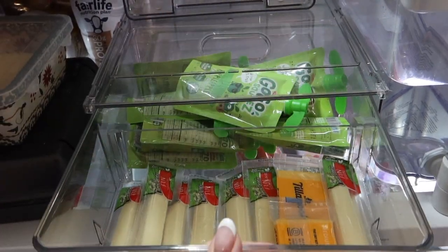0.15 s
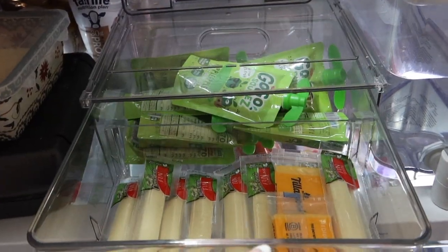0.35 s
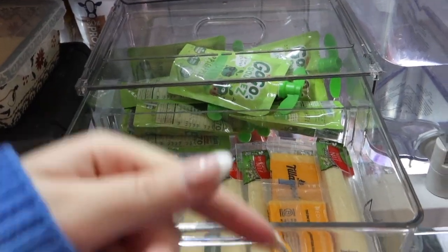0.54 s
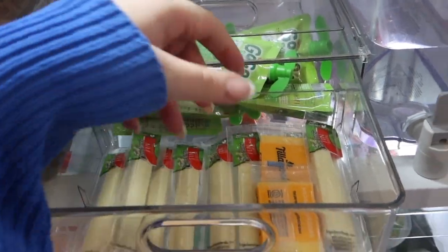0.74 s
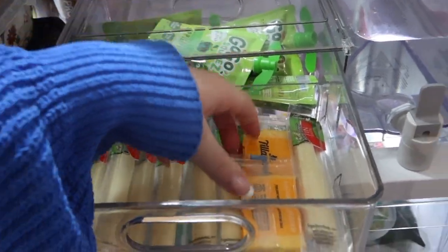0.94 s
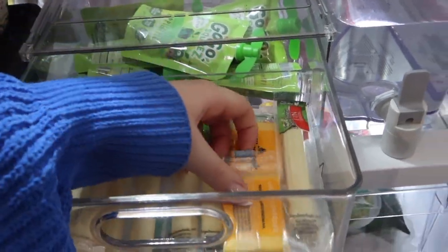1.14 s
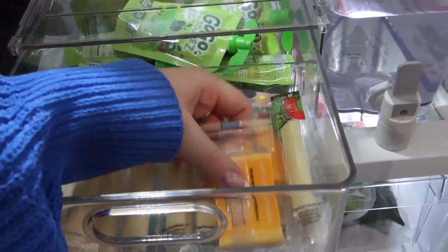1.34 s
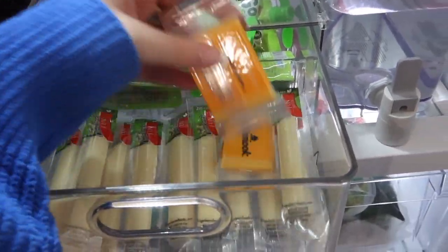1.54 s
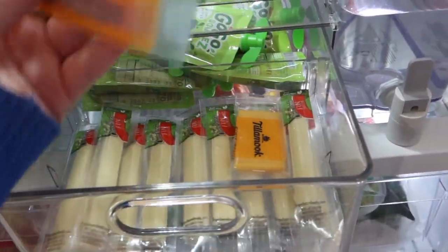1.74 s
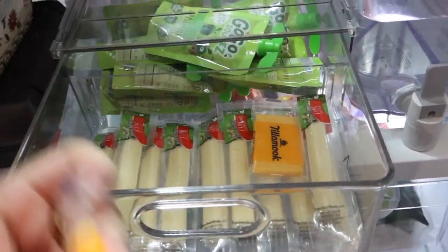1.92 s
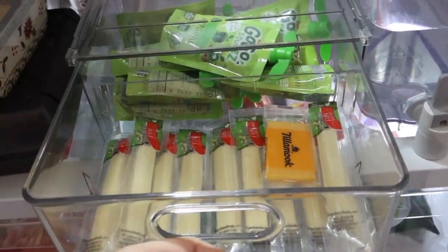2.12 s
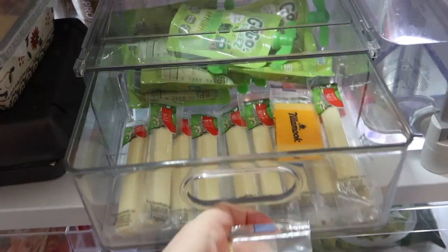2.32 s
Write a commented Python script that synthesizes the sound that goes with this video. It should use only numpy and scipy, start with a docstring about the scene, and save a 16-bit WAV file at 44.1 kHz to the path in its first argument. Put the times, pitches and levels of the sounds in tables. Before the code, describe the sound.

Hollow plastic knocks from a refrigerator drawer: soft sliding first, a sharp click, a brief pause, a busy cluster of clatter and crisp film crackle, then a strong thump and short scrape. Close miked over low fridge hush.

```python
"""Quiet kitchen, heard from close above: a clear plastic bin slides out of a fridge; a hand picks a wrapped
piece of cheese from it and starts to push it back.
Knocks ring modes of the bin and, swelling later, of the shelf and cabinet; wrappers snap (filtered noise bursts)
and rustle (dense grains); sliding is grain scrape plus cabinet rumble, over a low noise hush."""
import sys
import numpy as np
from scipy import signal
from scipy.fft import rfft, irfft, next_fast_len
from scipy.io import wavfile

SR = 44100
rng = np.random.default_rng(int(sys.argv[2]) if len(sys.argv) > 2 else 0)


def wav_record(signal):
    """Record a signal, one row per channel, as 16-bit PCM in the file named by sys.argv[1]."""
    frames = np.transpose(np.atleast_2d(signal))
    bounded = np.clip(frames, -1, 1)
    # unit amplitude maps onto the largest positive 16-bit level
    quanta = np.round(bounded * 32767).astype(np.int16)
    wavfile.write(sys.argv[1], SR, quanta)


N = 109147  # samples
RING_N, REFERENCE_S = 22050, 0.01  # ring length in samples; reference time for burst energy


def undb(db):
    """Decibels to amplitude gain."""
    return 10 ** (np.asarray(db) / 20)


def fade(t60_s):
    """Exponential decay over RING_N samples, -60 dB at t60_s."""
    return np.exp(-np.log(1000) * np.arange(RING_N) / SR / t60_s)


def set_energy(x, level_db):
    """Scale a burst to the energy of level_db rms held for REFERENCE_S."""
    return x * undb(level_db) * np.sqrt(REFERENCE_S * SR / np.sum(x ** 2))


def unit(x):
    """Scale to rms 1."""
    return x / np.sqrt(np.mean(x ** 2))


def add(out, x, start_s):
    """Mix x into out at start_s, cut at the end."""
    i = max(int(start_s * SR), 0)
    out[i:i + len(x)] += x[:max(N - i, 0)]


def curve(points, f):
    """Gain at f from (freq_hz, gain_db) points, linear in dB over log frequency."""
    hz, db = np.array(points).T
    return undb(np.interp(np.log(f), np.log(hz), db))


def colour(x, gain):
    """Minimum-phase filter with magnitude gain(f), built by folding the cepstrum."""
    size = 4096
    f = np.maximum(np.fft.rfftfreq(size, 1 / SR), 1)
    cepstrum = irfft(np.log(gain(f) + 1e-7))
    cepstrum[1:size // 2] *= 2
    cepstrum[size // 2 + 1:] = 0
    impulse = irfft(np.exp(rfft(cepstrum)))
    return signal.fftconvolve(x, impulse)[:len(x)]


RISE_CYCLES, DETUNE = 1.36, 0.007  # swell time in cycles; random detune, relative sd


def ring(modes, soft_hz, damping=1):
    """Modes swell, low ones later, and decay; a soft contact weakens those above soft_hz."""
    t = np.arange(RING_N) / SR
    detune = 1 + DETUNE * rng.standard_normal(len(modes))
    out = np.zeros(RING_N)
    for (hz, db, t60_s), d in zip(modes, detune):
        gain = undb(db) / np.hypot(1, (hz / soft_hz) ** 2)
        swell = 1 - np.exp(-(t * hz / RISE_CYCLES) ** 2)
        out += gain * swell * fade(t60_s / damping) * np.sin(2 * np.pi * hz * d * t)
    return out


TICK_S, TICK_DB = 0.00005, 9
TAIL_T60_S, TAIL_DB, TAIL_HZ = 0.11, -12, 7000


def crack(t60_s):
    """A tick, then the dense high modes of thin plastic as noise, and their echo in the fridge."""
    t = np.arange(RING_N) / SR
    near, echo = rng.standard_normal((2, RING_N))
    echo = signal.lfilter(*signal.butter(1, TAIL_HZ, fs=SR), echo)
    tick = undb(TICK_DB) * np.exp(-t / TICK_S)
    return near * (tick + fade(t60_s)) + echo * undb(TAIL_DB) * fade(TAIL_T60_S)


# narrow peaks and dips in the thin walls' high colour: [freq_hz, gain_db]
WALL_COLOUR = [(1580, 3.5), (2440, 4), (2820, 4), (3000, -9.5), (3720, 4.5), (4240, 6.5), (4980, 4.5),
               (5510, -16)]
WALL_WIDTH_HZ = 38


def walls(f):
    """Gain of the thin walls: narrow peaks and dips that colour cracks and film."""
    change = sum((undb(db) - 1) / (1 + (2 * (f - hz) / WALL_WIDTH_HZ) ** 2) for hz, db in WALL_COLOUR)
    return 1 + change


# modes of the bin, t60 before grip damping: [freq_hz, relative_level_db, t60_s]
BIN_MODES = [(309, -8, 0.3), (365.8, 8, 0.12), (500.7, -6.5, 0.22), (695.3, 10.5, 0.11), (725.5, 6, 0.076),
             (800.5, 6, 0.091), (960, -5.5, 0.08), (1120, -4, 0.029), (1300, -5.5, 0.041)]
# modes of the shelf and cabinet: [freq_hz, relative_level_db, t60_s]
CABINET_MODES = [(73.4, -2, 0.16), (110.8, 1.5, 0.25), (125.1, -2.5, 0.12), (178.5, -1, 0.14),
                 (231.1, 1.5, 0.085), (260, -0.5, 0.093)]
# colour of the cracks: [freq_hz, gain_db]
CRACK_COLOUR = [(300, -11.5), (600, -10.5), (1100, 3), (1650, -2), (2100, -1.5), (2850, 2), (3250, -4.5),
                (3700, -0.5), (5000, -3), (8000, -2.5), (15000, -10.5)]
# knocks on the bin:
# [start_s, cabinet_db, wall_db, soft_corner_hz, crack_db, crack_corner_hz, contact_s]
KNOCKS = [(.001, -28, -45, 408, -54, 1210, 0.0039), (0.118, -25.5, -38.5, 690, -43, 1630, 0.0018),
          (.129, -26.5, -37, 430, -46, 1550, 0.0095), (0.258, -34.5, -47.5, 700, -51.5, 1500, 0.0021),
          (.415, -23, -36, 260, -40.5, 1580, 0.0033), (0.4852, -29, -26, 1080, -27.5, 5400, 0.0007),
          (0.974, -25, -33.5, 260, -38.5, 3000, 0.0051), (.998, -19, -29, 704, -30.5, 1840, 0.0015),
          (1.013, -25.5, -29, 570, -37, 1200, 0.0042), (1.120, -23, -30, 450, -33, 1930, 0.0017),
          (1.152, -31, -46, 302, -31.5, 3500, 0.0025), (1.2272, -60, -37, 2500, -19, 5400, 0.00003),
          (1.246, -29, -28.5, 1500, -20.5, 3200, 0.0044), (1.276, -24, -36, 710, -37, 2580, 0.0047),
          (1.527, -27, -27.5, 586, -28, 980, 0.0011), (1.5402, -17.5, -21.5, 580, -30.5, 2620, 0.00047),
          (1.576, -22, -39, 295, -40, 3220, 0.0005), (1.602, -42, -36, 810, -38, 1300, 0.0029),
          (1.962, -38, -55, 300, -55, 2500, 0.0034), (2.1039, -15.5, -13, 1390, -38.5, 2760, 0.0065),
          (2.214, -57, -37, 356, -54, 1490, 0.0035), (2.3021, -41, -32.5, 910, -36, 1370, 0.0007),
          (2.329, -23.5, -37, 450, -55, 1400, 0.0031), (2.4305, -27, -36, 690, -37.5, 2200, 0.00091),
          (2.443, -25, -35, 402, -43, 1200, 0.0022)]
CRACK_T60_S = 0.064
GRIP_DB = -7  # a knock with this wall_db presses the hand on enough to halve the walls' t60


def knocks():
    """Each knock cracks as contact builds, rings the walls and shakes the cabinet."""
    out, t = np.zeros(N), np.arange(RING_N) / SR
    for start_s, cabinet_db, wall_db, soft_hz, crack_db, crack_hz, contact_s in KNOCKS:
        pressed = crack(CRACK_T60_S) * (1 - np.exp(-(t / contact_s) ** 2))
        edge = colour(pressed, lambda f: curve(CRACK_COLOUR, f) * walls(f) / np.hypot(1, (f / crack_hz) ** 2.14))
        damping = 1 + undb(wall_db - GRIP_DB)
        add(out, set_energy(ring(CABINET_MODES, soft_hz), cabinet_db), start_s)
        add(out, set_energy(ring(BIN_MODES, soft_hz, damping), wall_db), start_s)
        add(out, set_energy(edge, crack_db), start_s)
    return out


# bumps of the cheese block as it comes free: [start_s, level_db]
BUMPS = [(1.5261, -20.5), (1.5413, -20.5)]
# dull modes of the block: [freq_hz, relative_level_db, t60_s]
CHEESE_MODES = [(253, -3, 0.057), (305.5, -7, 0.082)]


def cheese_bumps():
    """The block bumps twice, ringing its dull modes."""
    out = np.zeros(N)
    for start_s, level_db in BUMPS:
        add(out, set_energy(ring(CHEESE_MODES, soft_hz=500), level_db), start_s)
    return out


# modes of the stiff front rim: [freq_hz, relative_level_db, t60_s]
RIM_MODES = [(1155, -0.5, 0.032), (1956, -5.5, 0.061), (2056, -3, 0.043), (2986, -1.5, 0.035),
             (3090, 1.5, 0.02), (3600, 2.5, 0.019), (4670, -5, 0.05), (5080, -3, 0.031), (5570, -3, 0.032)]
RIM_START_S, RIM_DB = 0.4864, -25


def rim_click():
    """The stiff front rim clicks once as the fingers let go, ringing its modes."""
    out = np.zeros(N)
    add(out, set_energy(ring(RIM_MODES, soft_hz=9000), RIM_DB), RIM_START_S)
    return out


FILM_TOP_HZ = 12800


def film(f, centre_hz, half_width_octaves):
    """Gain of a piece of film lying in the bin: a broad resonance, tilted down, times the walls."""
    octaves_off = np.log2(f / centre_hz)
    resonance = 1 / (1 + (octaves_off / half_width_octaves / 1.53) ** 2) ** 2
    tilt = np.sqrt(centre_hz / (f + 400))
    return walls(f) * tilt * resonance / np.hypot(1, (f / FILM_TOP_HZ) ** 5)


GRAINS_PER_S, GRAIN_SCATTER_DB = 2200, 2.7
SPOT_OCTAVES, GRAIN_T60_S = 0.6, 0.02


def grains(rate_per_s, scatter_db, spots=14):
    """Dense tiny slips of uneven size at several spots, each with a short ring in its own register."""
    hits = rng.random(N) < rate_per_s / SR
    size = undb(scatter_db * np.minimum(rng.exponential(size=N), 3))
    slips = hits * rng.choice([-1, 1], N) * size
    spot = rng.integers(spots, size=N)
    out = np.zeros(N)
    for k, hz in enumerate(np.geomspace(BIN_MODES[0][0], FILM_TOP_HZ, spots)):
        spot_ring = colour(crack(GRAIN_T60_S), lambda f: 1 / (1 + (np.log2(f / hz) / SPOT_OCTAVES) ** 2))
        out += signal.fftconvolve(slips * (spot == k), spot_ring)[:N]
    return unit(out)


# snaps of the wrappers: [start_s, level_db, centre_hz, half_width_octaves]
SNAPS = [(1.006, -41, 5700, 1.2), (1.0516, -41, 2220, 0.49), (1.142, -47, 8100, 1),
         (1.1584, -37.5, 4850, 2.2), (1.2283, -19, 5030, 0.52), (1.2427, -24, 3660, 0.28),
         (1.378, -34.5, 1680, 0.75), (1.3995, -36, 2250, 0.9), (1.4628, -41.5, 3300, 1.5),
         (1.473, -32.5, 2470, 0.63), (1.544, -44, 6950, 1.2), (1.6141, -27.5, 5200, 2.1),
         (1.6258, -26, 5100, 4), (1.9033, -39.5, 3770, 0.77), (2.027, -44.5, 5100, 0.4)]
SNAP_T60_S = 0.036


def snaps():
    """Stiff film buckles in single cracks."""
    out = np.zeros(N)
    for start_s, level_db, centre_hz, octaves in SNAPS:
        snap = colour(crack(SNAP_T60_S), lambda f: film(f, centre_hz, octaves))
        add(out, set_energy(snap, level_db), start_s)
    return out


# rustles of wrapper and sleeve: [peak_s, rise_s, fall_s, level_db, centre_hz]
RUSTLES = [(.08, 0.031, 0.024, -46.5, 1910), (1.105, 0.0045, 0.026, -43.5, 3600),
           (1.209, 0.012, 0.009, -34, 3130), (1.252, 0.0045, 0.0022, -17.5, 2660),
           (1.37, 0.093, 0.14, -39.5, 1880), (1.468, 0.0068, 0.025, -28, 2300),
           (1.513, 0.019, 0.015, -35, 1750), (1.71, 0.033, 0.12, -57.5, 4100),
           (2.03, 0.026, 0.077, -44, 2500), (2.218, 0.0047, 0.043, -46, 3620)]
RUSTLE_OCTAVES, SHEEN_DB = 1, -30  # half width; flat gain under the resonance


def rustles():
    """Dragged film: coloured grains under exponential rises and falls."""
    out, t = np.zeros(N), np.arange(N) / SR
    crinkle = grains(GRAINS_PER_S, GRAIN_SCATTER_DB)
    for peak_s, rise_s, fall_s, level_db, centre_hz in RUSTLES:
        swell = np.exp(-np.maximum((peak_s - t) / rise_s, (t - peak_s) / fall_s))
        rustle = unit(colour(crinkle, lambda f: film(f, centre_hz, RUSTLE_OCTAVES) + undb(SHEEN_DB)))
        out += undb(level_db) * swell * rustle
    return out


# the bin moving on its shelf, breakpoints: [time_s, rumble_db, scrape_db]
SLIDE = [(0, -47, -37.5), (.08, -36, -47.5), (.15, -36.5, -42), (.2, -44, -54.5), (0.298, -39, -58),
         (.4, -54.5, -49), (.52, -38.5, -43), (.62, -51.5, -70), (.95, -61, -67), (1.05, -34, -46.5),
         (1.43, -45, -51), (1.62, -28.5, -44), (1.78, -53.5, -68.5), (2.08, -50, -47), (2.2, -31, -43.5),
         (2.29, -42.5, -46), (2.35, -34.5, -39.5), (2.47, -46.5, -44.5)]
# colour of the scrape: [freq_hz, gain_db]
SCRAPE_COLOUR = [(200, 2.5), (370, 11.5), (560, -3), (720, 7), (1150, -0.5), (1600, -6.5), (2300, -8),
                 (4500, -15), (8000, -26), (15000, -40)]


def slide():
    """The bin sticks and slips on the shelf: grain scrape, and noise rumble through the cabinet modes."""
    t = np.arange(N) / SR
    time_s, rumble_db, scrape_db = np.array(SLIDE).T
    cabinet = ring(CABINET_MODES, soft_hz=500)
    rumble = unit(signal.fftconvolve(rng.standard_normal(N), cabinet)[:N])
    scrape = unit(colour(grains(GRAINS_PER_S, GRAIN_SCATTER_DB), lambda f: curve(SCRAPE_COLOUR, f)))
    rumble *= undb(np.interp(t, time_s, rumble_db))
    scrape *= undb(np.interp(t, time_s, scrape_db))
    return rumble + scrape


# judders of the runners on the shelf: [start_s, length_s, level_db]
RUBS = [(0.13, .04, -47), (0.364, 0.025, -46), (2.319, 0.031, -31), (2.4, 0.014, -46)]
# resonances they drive: [freq_hz, width_hz, gain_db]
RUNNER_RESONANCES = [(530, 100, -6.5), (900, 220, 2), (1345, 440, -8)]


def runner_gain(f):
    """Summed gain of the runner resonances."""
    return sum(undb(db) / (1 + ((f / hz - hz / f) * hz / width_hz) ** 2)
               for hz, width_hz, db in RUNNER_RESONANCES)


def rubs():
    """The runners catch and judder in short bursts of slips."""
    t = np.arange(N) / SR
    judder = unit(colour(grains(GRAINS_PER_S / 2, GRAIN_SCATTER_DB), runner_gain))
    level = sum(undb(level_db) / np.hypot(1, (2 * (t - start_s) / length_s - 1) ** 4)
                for start_s, length_s, level_db in RUBS)
    return judder * level


# side over mid of near sounds at the two microphones: [freq_hz, ratio_db]
NEAR_WIDTH = [(60, -38), (300, -21), (1400, -16), (2800, -13), (5500, -7), (10000, 0), (14000, 3)]
SCATTER_T60_S = 0.026
LEAN, LEAN_HZ = 0.034, 664  # the body of the bin sounds a little to the right


def spread(x):
    """Side signal of a near sound: the fridge walls scatter it differently to two close microphones."""
    size = next_fast_len(N + RING_N)
    f = np.fft.rfftfreq(size, 1 / SR) + 1
    phase = np.angle(rfft(rng.standard_normal(RING_N) * fade(SCATTER_T60_S), size))
    scattered = (1j * np.sin(phase) + 0.5 * np.cos(phase)) * curve(NEAR_WIDTH, f)
    lean = LEAN * np.exp(-np.log(f / LEAN_HZ) ** 2 / 2)
    return irfft(rfft(x, size) * (scattered - lean), size)[:N]


# colour of the hush: [freq_hz, gain_db]
KITCHEN_COLOUR = [(22, -11), (34, -2), (50, -9.5), (74, 4.5), (110, -23.5), (230, -7.5), (450, -20),
                  (1000, -25), (4000, -31), (15000, -50)]
# side over mid of the diffuse hush: [freq_hz, ratio_db]
KITCHEN_WIDTH = [(60, -24), (300, -2.5), (1000, 0.5), (3000, -3), (10000, -1)]
KITCHEN_DB = -47  # rms, before the side is coloured by KITCHEN_WIDTH


def hush():
    """One channel of coloured steady noise."""
    return undb(KITCHEN_DB) * unit(colour(rng.standard_normal(N), lambda f: curve(KITCHEN_COLOUR, f)))


def kitchen():
    """The low, steady hush of fridge and room: independent noise as mid and side."""
    return hush(), colour(hush(), lambda f: curve(KITCHEN_WIDTH, f))


def scene():
    """All sources over the kitchen's hush, mid/side to left/right."""
    mid, side = kitchen()
    handling = knocks() + cheese_bumps() + rim_click()
    for source in (handling, snaps() + rustles(), slide() + rubs()):
        mid = mid + source
        side = side + spread(source)
    return np.array([mid + side, mid - side])


TOP_HZ = 15800


def record(dry):
    """The recorder clips at full scale, then low-passes at TOP_HZ."""
    low_pass = signal.ellip(8, 0.2, 70, TOP_HZ, fs=SR, output="sos")
    return signal.sosfilt(low_pass, np.clip(dry, -1, 1))


dry = scene()
out = record(dry)
wav_record(out)
```